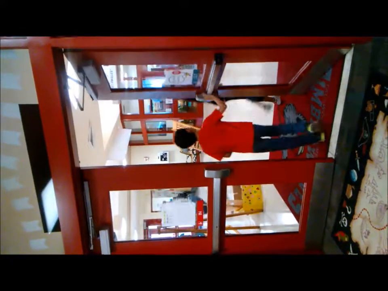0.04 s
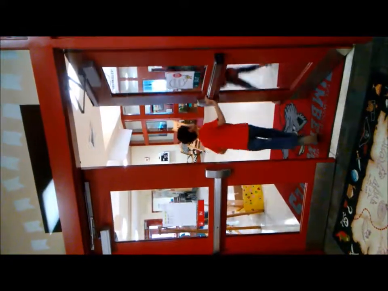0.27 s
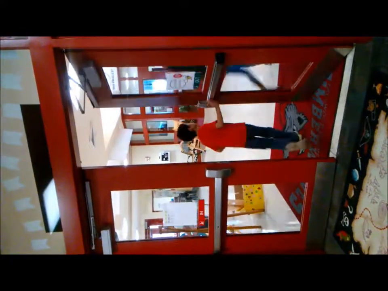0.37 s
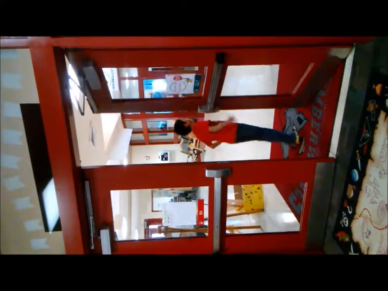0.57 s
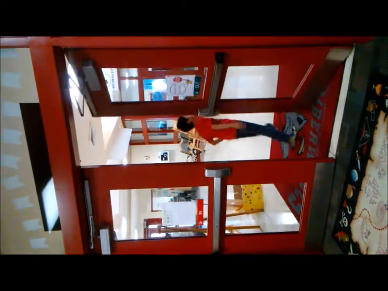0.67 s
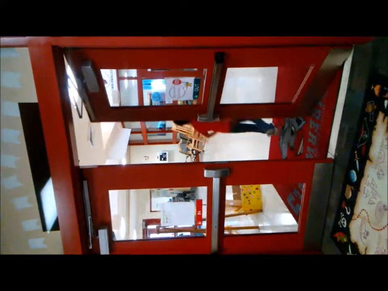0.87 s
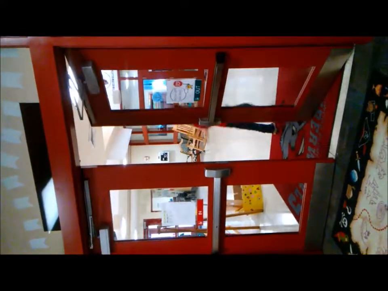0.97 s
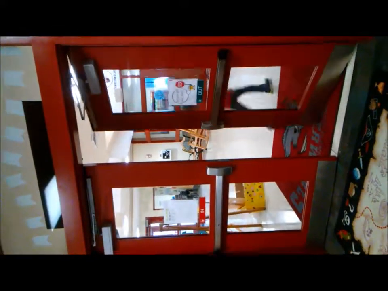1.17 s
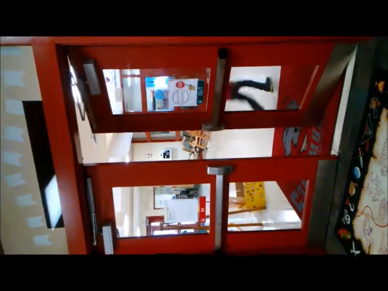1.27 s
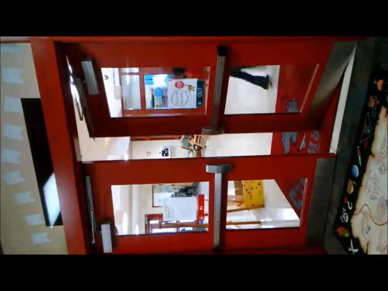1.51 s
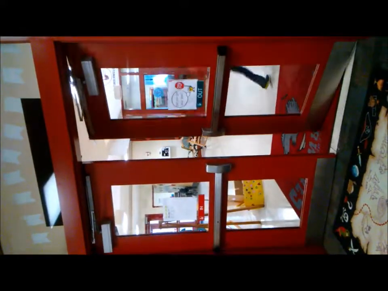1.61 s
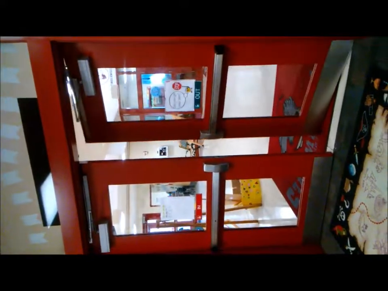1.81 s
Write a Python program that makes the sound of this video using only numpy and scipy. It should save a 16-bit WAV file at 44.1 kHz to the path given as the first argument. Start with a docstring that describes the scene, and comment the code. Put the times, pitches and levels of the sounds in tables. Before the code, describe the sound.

A glazed door clacks open, rattles, then creaks in jerks as it swings back.

```python
"""Glazed double door in a hard-walled hall.

The latch clacks, then the leaf clunks and its loose panes rattle. As the leaf swings back, its closer
creaks in separate stick-slip jerks that slow down and thin out. Soft steps and a few dull, hollow
knocks sound over the low hum of the building."""
import sys
import numpy as np
from scipy import signal
from scipy.fft import rfft, irfft
from scipy.io import wavfile

SR = 44100
rng = np.random.default_rng(int(sys.argv[2]) if len(sys.argv) > 2 else 0)


def dump(signal):
    """Clip the signal to [-1, 1] and save it as 16-bit WAV at the path in sys.argv[1]."""
    limited = np.clip(np.atleast_2d(signal).T, -1, 1)
    pcm = np.round(limited * 32767).astype(np.int16)
    wavfile.write(sys.argv[1], SR, pcm)


N = 81585


def undb(db):
    """Decibels to gain."""
    return 10 ** (np.asarray(db) / 20)


def clock():
    """Sample times in seconds."""
    return np.arange(N) / SR


def fade(t60_s):
    """Exponential decay, 60 dB down after t60_s."""
    return np.exp(-np.log(1000) * clock() / max(t60_s, 1e-3))


def rise(tau_s):
    """Exponential attack with time constant tau_s."""
    return 1 - np.exp(-clock() / tau_s)


def place(x, start_s):
    """Delay a sound to its start."""
    return np.concatenate([np.zeros(max(int(start_s * SR), 0)), x])[:N]


def octaves():
    """Filter frequency axis in octaves above 1 Hz."""
    return np.log2(np.maximum(np.arange(N + 1) * SR / (2 * N), 1))


def curve(points):
    """Join (Hz, value) points over log frequency."""
    hz, value = np.array(points, float).T
    return np.interp(octaves(), np.log2(hz), value)


def colour(x, curve_db):
    """Minimum-phase filter; white noise keeps its level."""
    gain = undb(curve_db)
    cepstrum = irfft(np.log(gain / np.sqrt(np.mean(gain ** 2)) + 1e-9))
    cepstrum[1:N] *= 2
    cepstrum[N + 1:] = 0
    return irfft(rfft(x, 2 * N) * np.exp(rfft(cepstrum)))[:N]


def band(hz, width_hz):
    """Noise in one steep resonance, reversed to start at full strength."""
    detuning = (2 ** octaves() - hz) / (width_hz / 2)
    return colour(rng.standard_normal(N), -20 * np.log10(1 + detuning ** 2))[::-1]


RING_RISE_S, FLUTTER_PER_S = 0.0053, 130
def ring(modes, rough=0):
    """Decaying modes of a struck body; rough is the share of power that flutters."""
    t, out = clock(), 0
    steps_s = np.arange(0, t[-1] + 1 / FLUTTER_PER_S, 1 / FLUTTER_PER_S)
    for hz, db, t60_s in modes:
        flutter = rng.standard_normal((2, N // 100))[:, :len(steps_s)]
        phase = 2 * np.pi * (hz * t + rng.random())
        in_phase, quadrature = (np.sqrt(rough / 2) * np.interp(t, steps_s, row) for row in flutter)
        mode = (np.sqrt(1 - rough) + in_phase) * np.sin(phase) + quadrature * np.cos(phase)
        out += undb(db) * fade(t60_s) * mode
    return out * (1 - fade(RING_RISE_S)) ** 2


def blows(hits, spectrum, modes, crack_t60_s, hall_db, ring_db, rough):
    """Each contact is a short crack, the hall's answer and the ring of the body."""
    out, curve_db, hall = 0, curve(spectrum), hall_tail()
    for start_s, db in hits:
        burst = rng.standard_normal(N) * fade(crack_t60_s) + undb(hall_db) * hall
        blow = colour(burst, curve_db) + undb(ring_db) * ring(modes, rough)
        out += undb(db) * place(blow, start_s)
    return out


# Blows of leaf and panes. Each row: start in seconds, level in dB.
LEAF_HITS = [(.3295, -29), (.336, -26), (.3435, -27), (.351, -26), (.358, -29.5), (.381, -38), (.411, -36),
             (.438, -39), (.547, -48)]
# Leaf spectrum. Each row: frequency in Hz, relative density in dB.
LEAF_SPECTRUM = [(60, -11), (200, -10.5), (450, -6.5), (680, -6), (950, -7.5), (1500, -11.5), (1900, -11),
                 (2800, -6), (3750, -13), (4600, -5), (6000, -8.5), (7000, -19.5), (8900, -39.5),
                 (15000, -45)]
# Leaf modes. Each row: frequency in Hz, relative level in dB, T60 in seconds.
LEAF_MODES = [(199.3, -23, 1), (232.5, -30.5, 0.34), (355, -20, 0.34), (550.6, -15.5, 0.5),
              (565, -20.5, 0.58), (813, -11, 0.33), (856, -27, 0.53), (1129, -19, 0.33), (3083, -6, 0.1)]
def leaf():
    """The leaf jolts and its loose panes chatter in the frame."""
    return blows(LEAF_HITS, LEAF_SPECTRUM, LEAF_MODES,
                 crack_t60_s=0.098, hall_db=-7.5, ring_db=2.5, rough=0.29)


# Handle and spring clinks. Each row: start in seconds, pitch in Hz, level in dB.
CLINKS = [(0.055, 4440, -41.5), (0.1843, 6250, -36.5)]
# Latch contacts. Each row: start in seconds, level in dB.
LATCH_HITS = [(.036, -62), (.056, -46), (.2102, -26), (.2148, -21), (.2205, -34)]
# Latch and push bar spectrum. Each row: frequency in Hz, relative density in dB.
LATCH_SPECTRUM = [(150, -26.5), (400, -33), (600, -19), (820, -4.5), (1100, -13), (1900, -18),
                  (2600, -11.5), (3700, -19), (4500, -5), (6200, -12), (9000, -40.5), (15000, -101)]
# Their modes. Each row: frequency in Hz, relative level in dB, T60 in seconds.
LATCH_MODES = [(571, -14.5, 0.82), (806, -6.5, 0.12), (914, -7.5, 0.58), (1720, -33, 0.31),
               (4790, -2, 0.19), (5905, -13, 0.19)]
def latch():
    """Handle and spring clink, then the bolt snaps back and the bar rings."""
    blip, tail = fade(0.015), undb(-6.5) * fade(0.27)
    envelope = (1 - fade(RING_RISE_S)) * (blip + tail)
    clinks = sum(undb(db) * place(band(hz, width_hz=650) * envelope, start_s)
                 for start_s, hz, db in CLINKS)
    return clinks + blows(LATCH_HITS, LATCH_SPECTRUM, LATCH_MODES,
                          crack_t60_s=0.028, hall_db=-11.5, ring_db=-6.5, rough=0.46)


# Closer jerks. Each row: start in seconds, arm level in dB, leaf level in dB, treble tilt in dB/octave.
SLIPS = [(0.733, -50, -50.5, -15), (.794, -39.5, -37.5, -8.5), (0.843, -36, -34, 2.5),
         (0.885, -36.5, -39, 4.5), (0.907, -39, -38.5, -3), (.943, -35.5, -37, 4.5), (0.968, -37, -38, 2.5),
         (1.026, -32, -33, 4), (1.111, -31.5, -31.5, 4.5), (1.175, -34, -34.5, 5), (1.219, -36.5, -38, 5.5),
         (1.2997, -36, -40, 4.5), (1.413, -35.5, -38.5, 6.5), (1.573, -35.5, -37.5, 8)]
# Floor and wall reflections. Each row: delay in seconds, relative level in dB.
SLIP_ECHOES = [(.0098, -2), (0.026, -19), (.075, -29)]
# Creak spectra, door open and nearly shut. Each row: frequency in Hz, relative density in dB.
OPEN_SPECTRUM = [(70, -30.5), (130, 0.5), (310, 1), (450, 2.5), (520, -1.5), (1420, 6), (1580, -3.5),
                 (1850, -7.5), (2060, 0.5), (2800, 0.5), (3500, -3.5), (4400, 2.5), (5700, -9),
                 (6050, -18.5), (7500, -22.5), (10000, -47.5)]
SHUT_SPECTRUM = [(80, -2), (200, -1), (560, -11), (1000, -2.5), (1450, -5.5), (2000, 3.5), (2800, 0),
                 (4000, -3.5), (4450, -19), (5000, -15), (5680, -7), (6300, -13), (7400, -34), (12000, -77)]
# Closer arm modes. Each row: frequency in Hz, relative level in dB, T60 in seconds.
ARM_MODES = [(1300, -22, 0.15), (1398, -24.5, 0.35), (2066, -20.5, 0.29), (2370, -30, 0.32),
             (2710, -17, 0.3), (3065, -13.5, 0.18), (3965, -22, 0.27), (4242, -15, 0.16), (4440, -22, 0.19),
             (5655, -8.5, 0.081)]
CROSSOVER_HZ, BODY_RISE_S = 1510, 0.014
SHUTTING_S, SHARED_POWER = (1.286, 1.56), 0.83
def closer():
    """Stick-slip jerks shake the arm and, more slowly, the leaf; near closing the arm pings."""
    out, shared = 0, rng.standard_normal(N)  # every jerk excites the same dense resonances
    swell = rise(0.0048)
    snap = undb(-5) * fade(0.0086)
    echo_power = sum(place(undb(db) * fade(0.012), delay_s) ** 2 for delay_s, db in SLIP_ECHOES)
    arm_envelope = np.sqrt((swell * fade(0.25)) ** 2 + snap ** 2 + echo_power)
    body_envelope = rise(BODY_RISE_S) * fade(0.48)
    lowpass = signal.butter(6, CROSSOVER_HZ, "low", fs=SR, output="sos")
    highpass = signal.butter(6, CROSSOVER_HZ, "high", fs=SR, output="sos")
    treble_octaves = np.maximum(octaves() - np.log2(2 * CROSSOVER_HZ), 0)
    ping = undb(-2) * band(5710, width_hz=390) * fade(0.02)
    hall = undb(-5) * swell * hall_tail()
    for start_s, arm_db, body_db, tilt in SLIPS:
        shut = np.interp(start_s, SHUTTING_S, (0, 1))
        curve_db = (1 - shut) * curve(OPEN_SPECTRUM) + shut * curve(SHUT_SPECTRUM)
        grain = np.sqrt(SHARED_POWER) * shared + np.sqrt(1 - SHARED_POWER) * rng.standard_normal(N)
        arm = undb(arm_db) * signal.sosfilt(highpass, grain * arm_envelope + hall)
        body = undb(body_db) * signal.sosfilt(lowpass, grain * body_envelope)
        rasp = undb(-10) * band(5370, width_hz=1400) * fade(0.06)  # sliding contact
        metal = undb(arm_db) * (swell * ring(ARM_MODES) + rasp)
        creak = colour(arm + body + metal, curve_db + tilt * treble_octaves)
        out += place(creak + shut * undb(arm_db) * ping, start_s)
    return out


# Dull thuds. Each row: start in seconds, pitch in Hz, level in dB, T60 in seconds.
THUDS = [(0.06, 128, -43, 0.12), (.094, 208.7, -39.5, 0.19), (0.133, 272, -43, 0.099),
         (0.272, 135.4, -44.5, 0.19), (0.331, 93.6, -33, 0.097), (0.375, 186, -27.5, 0.094),
         (0.402, 211.5, -32, 0.2), (0.402, 124, -36.5, 0.23), (0.407, 315, -35.5, 0.27),
         (0.483, 97, -44.5, 0.15), (0.517, 66, -43, 0.136), (0.556, 260.5, -52, 0.36),
         (1.417, 65, -53.5, 0.17)]
def thuds():
    """Soft, heavy contacts of feet, leaf and frame: a low tone inside a rumble."""
    out = 0
    for start_s, hz, db, t60_s in THUDS:
        tone = np.sin(2 * np.pi * hz * clock())
        rumble = undb(1) * band(hz, width_hz=0.82 * hz)
        out += undb(db) * place((tone + rumble) * fade(t60_s) * rise(0.0043), start_s)
    return out


# Leaf groans. Each row: start in seconds, pitch in Hz, level in dB.
GROANS = [(0.842, 312.4, -39), (.95, 371, -43), (1.035, 428.6, -41.5), (1.19, 345.6, -50)]
GROAN_T60_S = 0.36
def groans():
    """Hollow resonances of the swinging leaf swell under the jerks, each at its own pitch."""
    return sum(place(rise(BODY_RISE_S) * ring([(hz, db, GROAN_T60_S)], rough=0.15), start_s)
               for start_s, hz, db in GROANS)


# Knocks. Each row: start in seconds, pitch in Hz, level in dB, T60 in seconds.
KNOCKS = [(1.763, 382.8, -53, 0.24), (1.809, 353, -40, 0.074), (1.840, 314, -41, 0.071)]
# Their partials. Each row: frequency ratio, relative level in dB.
KNOCK_PARTIALS = [(1, 4), (2.05, -8.5), (2.68, -6.5)]
def knocks():
    """Faint, hollow, pitched knocks with soft attacks."""
    out = 0
    for start_s, hz, db, t60_s in KNOCKS:
        modes = [(hz * ratio, db + partial_db, t60_s) for ratio, partial_db in KNOCK_PARTIALS]
        out += place(rise(0.0065) * ring(modes), start_s)
    return out


# Shuffle envelope. Each row: time in seconds, level in dB.
SHUFFLE_LEVELS = [(0, -54), (0.051, -47.5), (.14, -54), (.19, -50.5), (.33, -55), (.6, -73)]
# Shuffle spectrum. Each row: frequency in Hz, relative density in dB.
SHUFFLE_SPECTRUM = [(150, -42), (250, -8), (2170, -17), (3400, -27.5), (4410, -25), (8000, -37),
                    (10400, -87)]
def shuffle():
    """Shoes and clothes brush along on the way to the door."""
    level_db = np.interp(clock(), *np.array(SHUFFLE_LEVELS).T)
    return undb(level_db) * colour(rng.standard_normal(N), curve(SHUFFLE_SPECTRUM))


# Hall decay. Each row: frequency in Hz, T60 in seconds.
HALL_DECAY = [(80, 0.91), (300, 0.56), (1000, 0.62), (2500, 0.47), (5000, 0.33), (9000, 0.34)]
def hall_tail():
    """Diffuse reverberation whose treble dies first."""
    noise_spectrum, out = rfft(rng.standard_normal(2 * N)), 0
    for band_hz, t60_s in HALL_DECAY:
        weight = curve([(hz, hz == band_hz) for hz, _ in HALL_DECAY])
        out += irfft(noise_spectrum * weight)[:N] * fade(t60_s)
    return out


# Hall air spectrum. Each row: frequency in Hz, relative density in dB.
AIR_SPECTRUM = [(60, 2.5), (250, 1), (500, -17), (900, -6), (2500, -12), (8000, -24.5)]
AIR_DB, HUM_DB, HISS_DB = -61.5, -66, -92
def building():
    """Still air, a wavering low hum and a faint hiss."""
    air = undb(AIR_DB) * colour(rng.standard_normal(N), curve(AIR_SPECTRUM))
    hum = undb(HUM_DB) * band(60, width_hz=52)
    return air + hum + undb(HISS_DB) * rng.standard_normal(N)


def scene():
    """Door, walker and hall, in mono."""
    return (latch() + leaf() + thuds() + closer() + groans() + knocks() + shuffle() + building())[None]


BOTTOM_HZ, TOP_HZ = 45, 15600
def record(dry):
    """Roll off the deepest bass and cut the top steeply."""
    thinned = signal.sosfilt(signal.butter(4, BOTTOM_HZ, "high", fs=SR, output="sos"), dry)
    return signal.sosfilt(signal.ellip(10, .2, 70, TOP_HZ, fs=SR, output="sos"), thinned)


dry = scene()
out = record(dry)
dump(out)
```